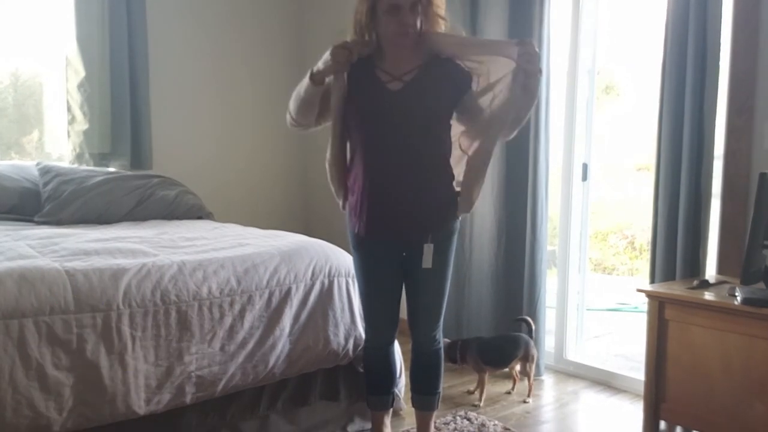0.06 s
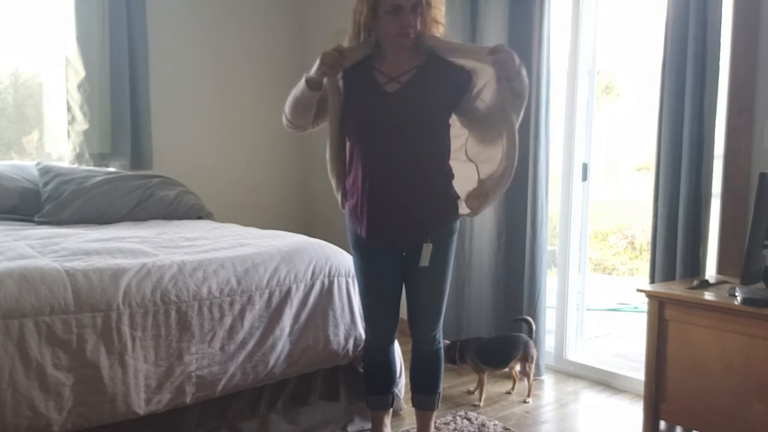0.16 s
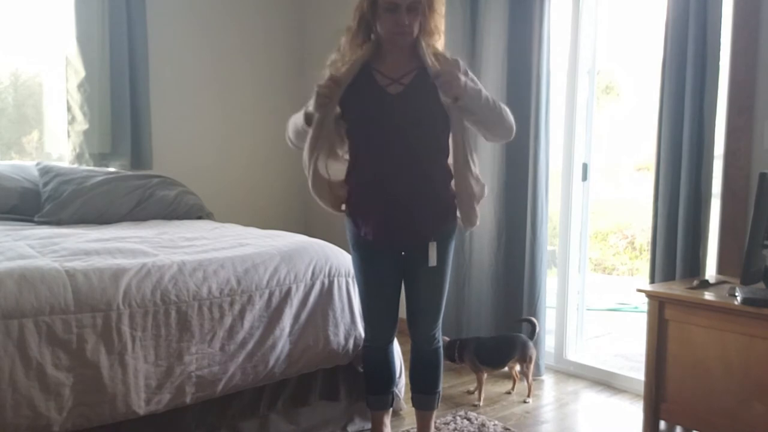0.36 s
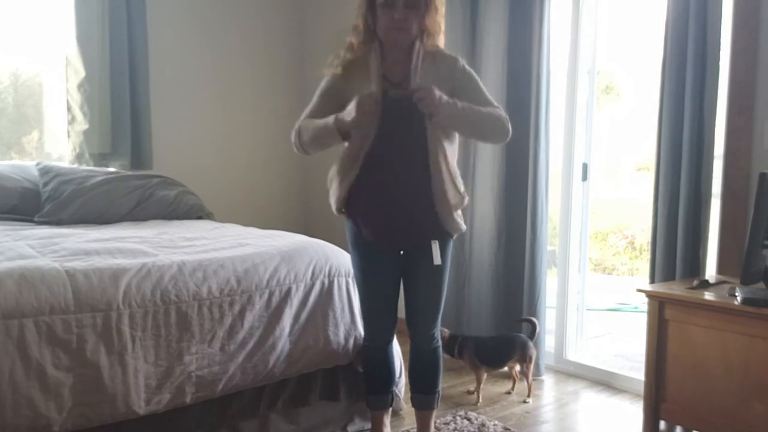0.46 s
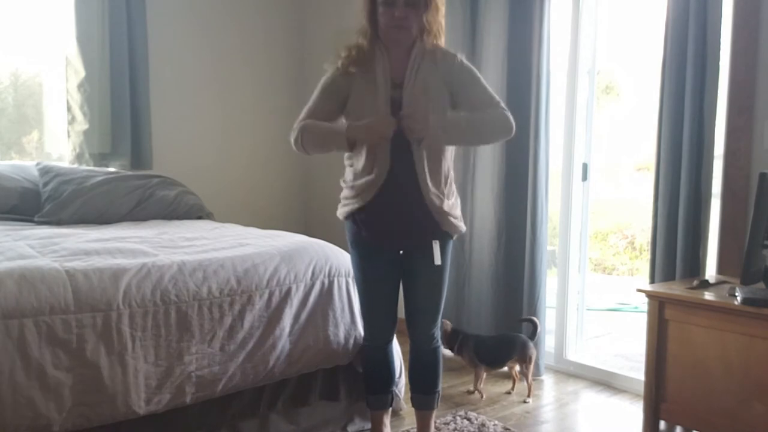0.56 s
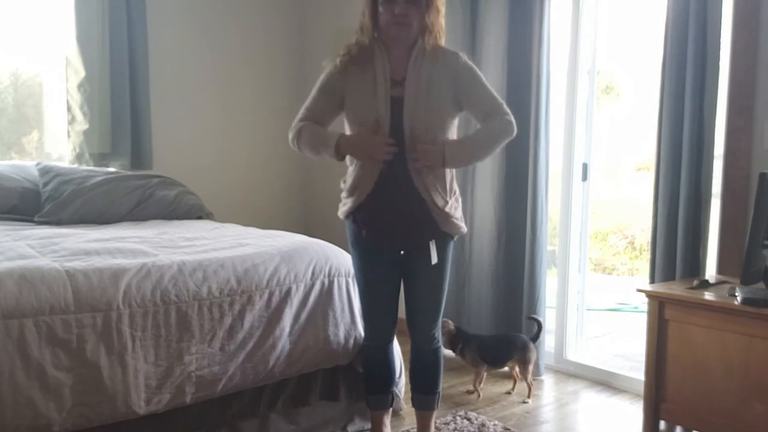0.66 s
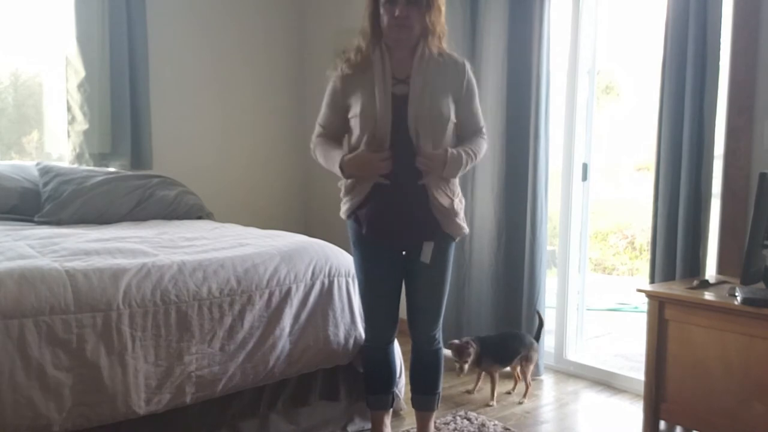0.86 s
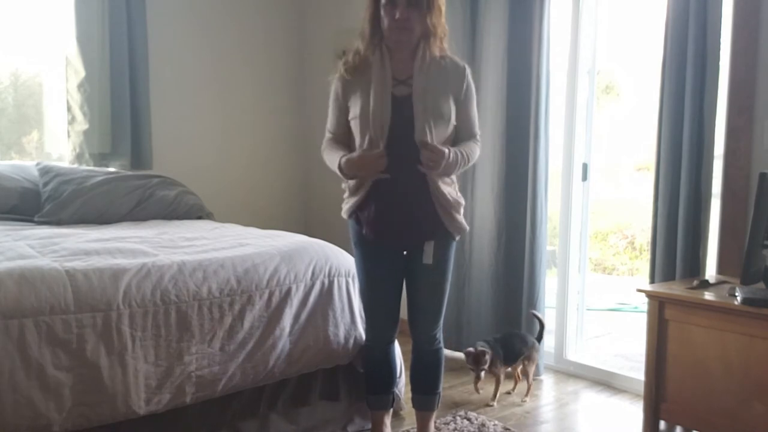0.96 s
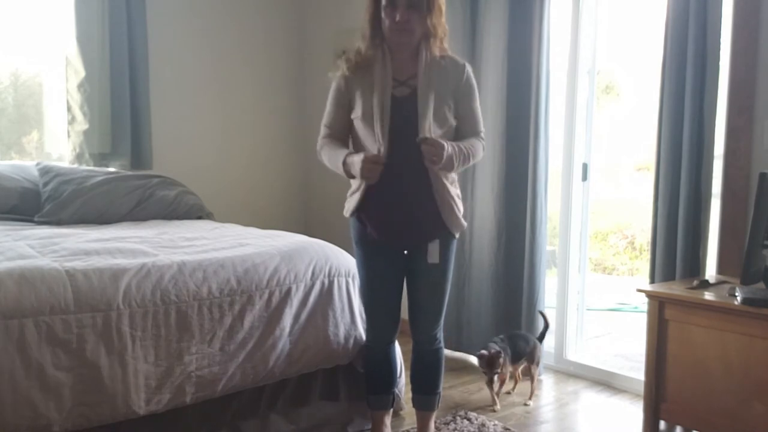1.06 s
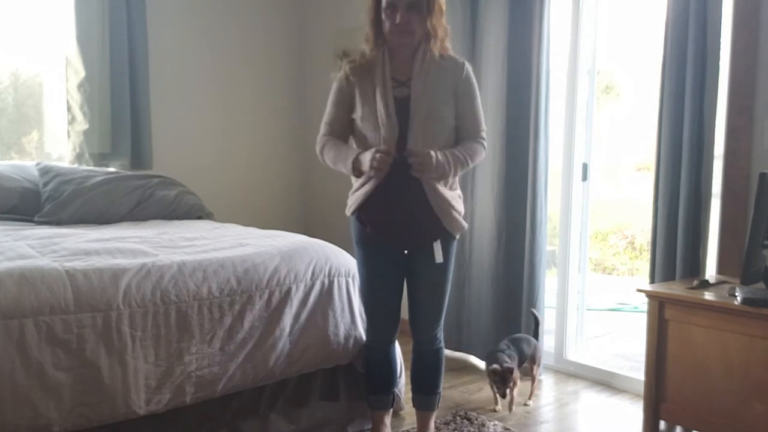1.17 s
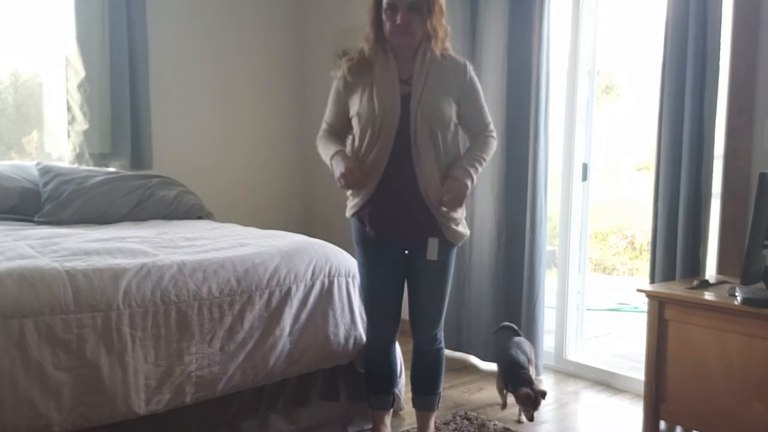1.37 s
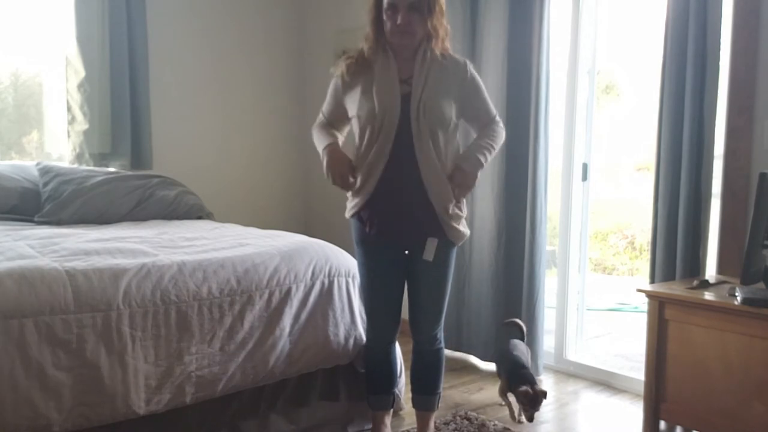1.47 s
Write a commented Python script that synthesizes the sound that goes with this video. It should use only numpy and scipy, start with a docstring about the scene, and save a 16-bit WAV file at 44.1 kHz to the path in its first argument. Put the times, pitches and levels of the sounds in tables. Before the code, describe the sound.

A small dog's claws click and paws thump on a wooden bedroom floor, with soft cloth swishes

```python
"""Over a quiet steady hiss a small dog patters across a wooden bedroom floor, heard by two spaced microphones.
First paws thump the boards as dying low tones and knocks, then claws click as struck, ringing nails.
Soon claws skid as gritty noise, cloth swishes as a jacket is pulled on, and dull taps mix rub with two rings.
Clicks crowd together past the middle; a few steps, swishes and taps follow, and a last soft thump ends it.
Sparse, randomly signed reflections put the floor and cloth sounds in a room."""
import sys
import numpy as np
from scipy import signal
from scipy.fft import rfft, irfft
from scipy.io import wavfile
from scipy.ndimage import uniform_filter1d

SR = 44100
rng = np.random.default_rng(int(sys.argv[2]) if len(sys.argv) > 2 else 0)


def dump(signal):
    """Clip the signal to [-1, 1] and save it as 16-bit WAV at the path in sys.argv[1]."""
    limited = np.clip(np.atleast_2d(signal).T, -1, 1)
    pcm = np.round(limited * 32767).astype(np.int16)
    wavfile.write(sys.argv[1], SR, pcm)


def magnitude_from_level(level_db):
    """Linear magnitude for a level in decibels (20 dB per decade)."""
    exponent = np.asarray(level_db, float) / 20
    return 10 ** exponent


N = 66150  # samples, 1.5 s


def evened(x):
    """Scales to rms 1."""
    return x / np.sqrt(np.mean(x ** 2) + 1e-20)


def read(points, hz):
    """Reads a table on a log-frequency axis."""
    f, value = np.transpose(points)
    return np.interp(np.log(hz + 1), np.log(f + 1), value)


def add(mix, start_s, sound):
    """Mixes a sound in at start_s, cut off at the end of the mix."""
    part = mix[max(round(start_s * SR), 0):][:len(sound)]
    part += sound[:len(part)]


def resonate(x, hz, width_hz):
    """A one-pole resonance: shifts hz down to zero, smooths, and shifts back with gain 1."""
    turn = np.exp(2j * np.pi * hz * np.arange(len(x)) / SR)
    r = np.exp(-np.pi * abs(width_hz) / SR)
    return 2 * (turn * signal.lfilter([1 - r], [1, -r], x / turn)).real


def coloured(x, db):
    """Filters x by a gain in dB given as a function of Hz."""
    gain = magnitude_from_level(db(np.fft.rfftfreq(x.shape[-1], 1 / SR)))
    return irfft(rfft(x) * gain, x.shape[-1])


def alike(channels):
    """Makes two unrelated channels alike in the bass, as spaced microphones hear diffuse sound."""
    # left-right likeness of diffuse sound: pitch_hz [Hz], likeness [0 to 1]
    likeness = [(60, 0.93), (290, 0.63), (640, 0.46), (1400, 0.1), (15000, 0.0091)]
    left, other = rfft(channels)
    c = np.clip(read(likeness, np.fft.rfftfreq(channels.shape[1], 1 / SR)), 0, 1)
    right = c * left + np.sqrt(1 - c ** 2) * other
    return irfft(np.array([left, right]), channels.shape[1])


def hiss():
    """Steady room and microphone noise: coloured random noise, alike in the bass."""
    # hiss spectrum: pitch_hz [Hz], relative gain_db [dB]
    spectrum = [(18, -47), (30, 16.5), (374, -3), (1960, -4), (2830, 5.5), (4420, 3.5), (4780, 1.5),
                (6050, 1.5), (7470, 2), (16000, -10)]
    level_db = -55.5  # rms over both channels

    def colour(f):
        # flat below 120 Hz, and 40 dB down under 30 Hz
        return read(spectrum, np.maximum(f, 120)) - 40 * (f < 30)

    noise = alike(rng.standard_normal((2, N)))
    return magnitude_from_level(level_db) * evened(coloured(noise, colour))


def room(x):
    """Sparse reflections of random sign, each band dying at its own speed."""
    # reverberation time: pitch_hz [Hz], t60_s [s]
    decay = [(100, 0.45), (530, 0.35), (1390, 0.44), (3680, 0.34), (9700, 0.18), (16000, 0.12)]
    first, spacing = 160, 20  # samples: silence before the echoes, and one echo in each slot
    echo = np.zeros((2, SR))
    slots = np.arange(first, SR - spacing, spacing)
    at = slots + rng.integers(0, spacing, (2, len(slots)))
    np.put_along_axis(echo, at, rng.choice([-1., 1.], at.shape), 1)
    hz, t, z = signal.stft(alike(echo), SR, nperseg=256)
    dying = z * magnitude_from_level(-60 * t / read(decay, hz)[:, None])
    tail = signal.istft(dying, SR, nperseg=256)[1]
    tail[:, :first] = 0
    tail = tail / np.linalg.norm(tail[0])
    return signal.fftconvolve(x[None], tail, axes=1)[:, :N]


def cloth():
    """Fluttering friction noise from a wide source that rises, holds and fades: three unrelated strands."""
    # cloth swishes: start_s [s], rise_s [s], hold_s [s], level_db [dB],
    # dull_db [dB per octave of extra treble loss above 2500 Hz; negative brightens]
    swishes = [(0.23, 0.004, 0.079, -44.5, -2.5), (0.631, 0.023, 0.065, -40, -1.2),
               (0.802, 0.04, 0.059, -43.5, -1.9), (0.957, 0.0071, 0.015, -46, -1.5),
               (1.095, 0.022, 0.046, -39.5, -3.04), (1.283, 0.0056, 0.008, -41, -3.5),
               (1.395, 0.017, 0.012, -52.5, -1.5)]
    # colour of the rubbing cloth: pitch_hz [Hz], relative gain_db [dB]
    fabric = [(180, -62), (300, -21), (814, -13), (1060, -9), (1170, -11), (2030, -9.5), (2570, 0.5),
              (11500, -9.5), (16000, -12.5)]
    t60_s, flutter_db = 0.22, 1.2  # fade time; rms swing of the level
    out, t = np.zeros((3, N)), np.arange(SR // 2) / SR
    for start_s, rise_s, hold_s, level_db, dull_db in swishes:
        noise = rng.standard_normal((4, SR // 2))

        def colour(f):
            return read(fabric, f) - dull_db * np.log2(np.maximum(f, 2500) / 2500)

        rub = evened(coloured(noise[:3], colour))
        rise = np.sin(np.pi / 2 * np.minimum(t / rise_s, 1)) ** 2
        fade = magnitude_from_level(-60 * np.maximum(t - rise_s - hold_s, 0) / t60_s)
        flutter = flutter_db * evened(uniform_filter1d(noise[3], size=150))
        add(out.T, start_s, (rub * rise * fade * magnitude_from_level(level_db + flutter)).T)
    return out


def taps():
    """Soft hollow taps: strong rubbing noise at the tap's pitch, with two close rings, dies away together."""
    # dull hollow taps: start_s [s], level_db [dB], pitch_hz [Hz], t60_s [s]
    hollow_taps = [(0.378, -44, 1180, 0.061), (.566, -38, 1172, 0.22), (1.204, -53, 1226, 0.21),
                   (1.337, -49.5, 1159, 0.064), (1.364, -48.5, 1145, 0.041), (1.379, -53.5, 1013, 0.06)]
    lower_ratio, lower_db = 0.81, 0  # second ring: pitch ratio, level against the first
    width_hz, rub_db = 380, 5  # width of each resonance pass; rub rms against the first ring's peak
    out, t = np.zeros(N), np.arange(6000) / SR
    for start_s, level_db, pitch_hz, t60_s in hollow_taps:
        noise = rng.standard_normal(6000)
        upper = np.sin(2 * np.pi * pitch_hz * t)
        lower = magnitude_from_level(lower_db) * np.sin(2 * np.pi * lower_ratio * pitch_hz * t)
        rub = evened(resonate(resonate(noise, pitch_hz, width_hz), pitch_hz, width_hz))
        shape = magnitude_from_level(level_db - 60 * t / t60_s) * np.minimum(t / 0.0014, 1)  # 1.4 ms rise
        add(out, start_s, shape * (upper + lower + magnitude_from_level(rub_db) * rub))
    return out


def thumps():
    """Boards flex under weight: a low dying tone and a knock of modes, a little different each time."""
    # paw and foot thumps: start_s [s], level_db [dB], pitch_hz [Hz], t60_s [s],
    # knock_db [dB against the low tone]
    steps = [(0.095, -42, 79.4, 0.77, -12.5), (0.131, -34.5, 66.5, 0.098, -22.5),
             (0.195, -43.5, 60.7, 0.15, -26), (0.23, -24.5, 60, 0.11, -25.5),
             (0.294, -32.5, 60.4, 0.12, -19.5), (0.478, -41.5, 90.4, 0.42, -16),
             (0.524, -33.5, 66.6, 0.23, -44), (0.546, -18.5, 80.5, 0.16, -9), (0.603, -36, 68, 0.37, -3),
             (0.653, -26, 58.3, 0.15, -13), (0.718, -29, 45.3, 0.11, -21), (0.784, -34.5, 47.4, 0.097, -40),
             (0.885, -31.5, 61.8, 0.2, -20), (.94, -23.5, 68.3, 0.043, -36.5),
             (1.121, -49, 72.4, 0.14, -37), (1.205, -41, 54, 0.14, -22), (1.257, -41, 53, 0.073, -22),
             (1.485, -43, 57.3, 0.47, -20)]
    # board modes: pitch_hz [Hz], level_db [dB], t60_s [s]
    modes = [(131.6, -0.5, 0.16), (189, -3, 0.16), (328.8, -5.5, 0.16), (383, -5, 0.1), (588, -2, 0.038)]
    rise_s, knock_rise_s = 0.0035, 0.0024
    level_spread_db, detune = 2, 0.038  # random spread of each mode: level, share of its pitch
    out, t = np.zeros(N), np.arange(SR // 2) / SR
    for start_s, level_db, pitch_hz, t60_s, knock_db in steps:
        rise = 1 - np.exp(-(t / rise_s) ** 2)
        flex = -rise * np.cos(2 * np.pi * pitch_hz * t) * magnitude_from_level(-60 * t / t60_s)
        knock = np.zeros(len(t))
        for mode_hz, mode_db, mode_t60_s in modes:
            a, b = rng.standard_normal(2)
            fade = magnitude_from_level(mode_db + level_spread_db * a - 60 * t / mode_t60_s)
            knock += fade * np.sin(2 * np.pi * mode_hz * (1 + detune * b) * t)
        knock *= np.minimum(t / knock_rise_s, 1) ** 2
        add(out, start_s, magnitude_from_level(level_db) * (flex + magnitude_from_level(knock_db) * knock))
    return out


def thin(x):
    """Small contacts radiate nothing low: a steep high-pass."""
    return signal.sosfilt(signal.butter(4, 1570, "high", fs=SR, output="sos"), x)


def skids():
    """Claws skid on the boards: gritty friction noise through the nail's broad ring."""
    # claw skids: start_s [s], level_db [dB], pitch_hz [Hz], rise_s [s], t60_s [s]
    scrapes = [(0.218, -36, 3050, 0.0069, 0.25), (.236, -29.5, 2800, 0.0057, 0.1),
               (.3735, -30, 3900, 0.004, 0.008), (0.5588, -18, 2870, 0.007, 0.024),
               (.57, -28.5, 2820, 0.0065, 0.36), (0.884, -44.5, 2810, 0.0026, 0.028),
               (0.976, -38, 2750, 0.0091, 0.082), (1.201, -33.5, 2860, 0.0037, 0.038),
               (1.223, -29, 3120, 0.013, 0.019)]
    width_hz, grit_db = 2050, 1  # width of each resonance pass; rms swing of the friction
    out, t = np.zeros(N), np.arange(SR // 4) / SR
    for start_s, level_db, pitch_hz, rise_s, t60_s in scrapes:
        noise, swing = rng.standard_normal((2, SR // 4))
        grit = noise * magnitude_from_level(grit_db * evened(uniform_filter1d(swing, size=40)))
        ring = resonate(resonate(grit, pitch_hz, width_hz), pitch_hz, width_hz)
        rise = np.minimum(t / rise_s, 1) ** 2
        fade = magnitude_from_level(level_db - 60 * np.maximum(t - rise_s, 0) / t60_s)
        add(out, start_s, evened(thin(ring)) * rise * fade)
    return out


def claws():
    """A hard blow with a little grit rings the nail, with a bright crack on top."""
    # claw clicks: start_s [s], level_db [dB], pitch_hz [Hz], crack_db [dB of treble crack against ring]
    clicks = [(0.145, -24, 4330, -25), (.213, -37, 7360, -18), (0.2354, -24.5, 3920, 10),
              (0.3782, -17, 4070, 0), (0.3815, -16.5, 6800, -8), (.5375, -22, 3900, -34),
              (0.8808, -17.5, 3260, 1.5), (0.8819, -18, 3760, -0.5), (0.8985, -15.5, 4640, -30),
              (0.8999, -17.5, 2730, 0), (0.9042, -17.5, 2530, -34), (0.917, -31, 2460, -23),
              (1.237, -21, 4960, -13), (1.287, -50, 5500, -12)]
    width_hz = 2960  # of each resonance pass
    contact_s, grit = 0.0011, 0.18  # grit: decay constant, level against the blow
    bright = signal.butter(2, [5000, 17000], "band", fs=SR, output="sos")
    out, t = np.zeros(N), np.arange(512) / SR
    for start_s, level_db, pitch_hz, crack_db in clicks:
        noise = rng.standard_normal(512)
        hit = (t == 0) + grit * noise * np.exp(-t / contact_s)
        ring = thin(resonate(resonate(hit, pitch_hz, width_hz), pitch_hz, width_hz))
        crack = signal.sosfilt(bright, hit)
        click = ring / abs(ring).max() + magnitude_from_level(crack_db) * crack / abs(crack).max()
        add(out, start_s, magnitude_from_level(level_db) * click)
    return out


def pair(x):
    """Direct sound at two microphones: later at the right, and dulled there by the body between them."""
    late_samples, shadow_db = 16, -10  # the loss grows from 2 kHz and is full from 4 kHz up
    late = np.r_[np.zeros(late_samples), x[:-late_samples]]

    def shadow(f):
        return shadow_db * np.clip(np.log2(f / 2000 + 1e-9), 0, 1)

    return np.array([x, coloured(late, shadow)])


def scene():
    """All sources, direct and through the room, over the hiss."""
    click, skid, low, rub = claws(), skids(), thumps() + taps(), cloth()
    # room sends in dB; one cloth strand feeds the room, the other two are heard directly
    send = magnitude_from_level(-7) * click + magnitude_from_level(-4) * skid + magnitude_from_level(-10) * low + magnitude_from_level(-2) * rub[0]
    return pair(click + skid + low) + alike(rub[1:]) + room(send) + hiss()


def band_limit(x):
    """A steep low-pass at the top of the band."""
    return signal.sosfilt(signal.butter(12, 16590, fs=SR, output="sos"), x)


def record(dry):
    """The left microphone faces the sound and hears more treble; both lose lowest bass and top treble."""
    low_hz, top_hz = 39, 15830
    left_db = 2.5  # left over right from 4 kHz up
    dry = signal.sosfilt(signal.butter(3, low_hz, "high", fs=SR, output="sos"), dry)
    dry = signal.sosfilt(signal.ellip(8, 0.5, 32, top_hz, fs=SR, output="sos"), dry)

    def tilt(f):
        # half the difference, growing from 500 Hz over three octaves
        return left_db / 2 * np.clip(np.log2(f / 500 + 1e-9) / 3, 0, 1)

    left = coloured(dry[0], tilt)
    right = coloured(dry[1], lambda f: -tilt(f))
    return band_limit(np.array([left, right]))


dry = scene()
out = record(dry)
dump(out)
```